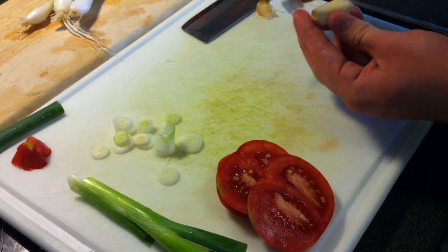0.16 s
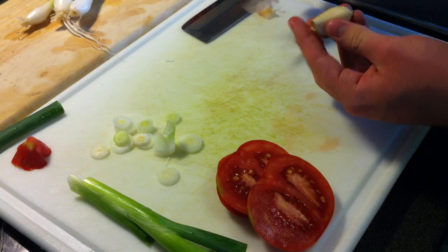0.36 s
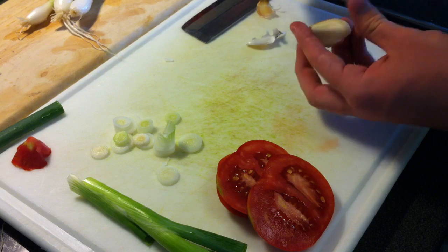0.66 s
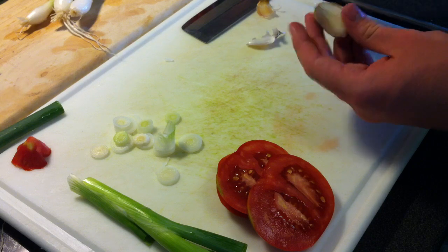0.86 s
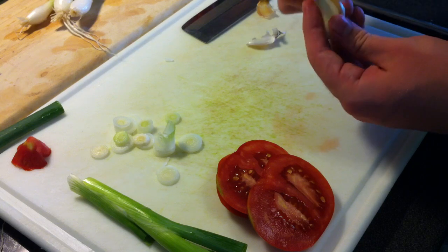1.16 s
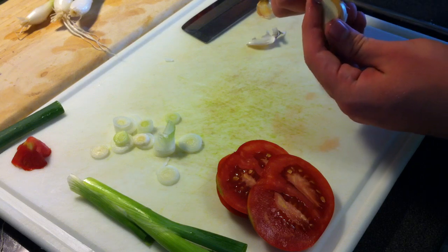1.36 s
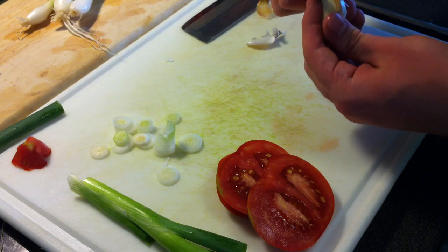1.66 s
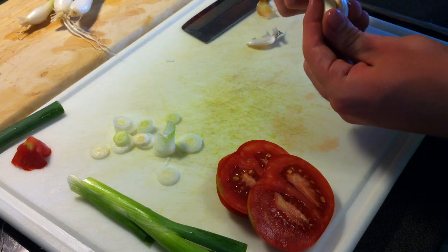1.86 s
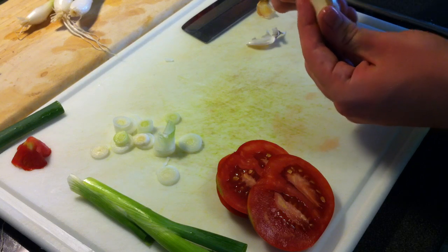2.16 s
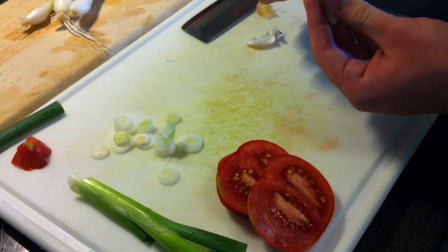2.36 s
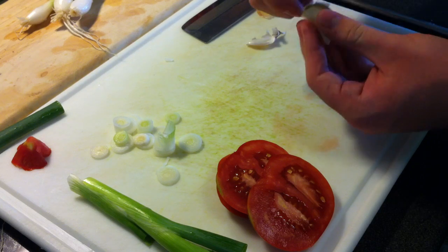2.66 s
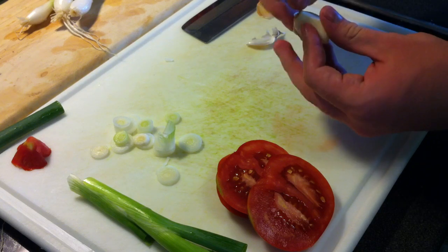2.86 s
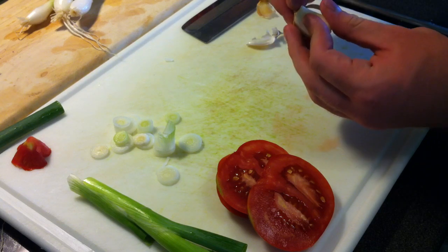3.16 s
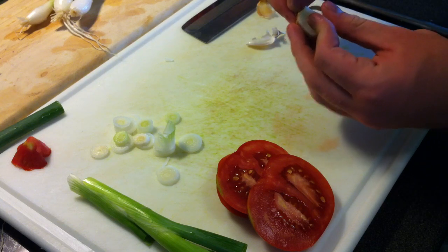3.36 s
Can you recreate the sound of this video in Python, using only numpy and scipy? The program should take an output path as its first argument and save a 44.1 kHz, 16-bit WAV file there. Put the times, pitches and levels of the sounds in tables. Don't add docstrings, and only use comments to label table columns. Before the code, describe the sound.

Papery garlic husk tears and ticks close by in a quiet kitchen with faint hum

```python
import sys
import numpy as np
from scipy import signal
from scipy.fft import rfft, irfft
from scipy.io import wavfile
from scipy.ndimage import uniform_filter1d

SR = 44100
rng = np.random.default_rng(int(sys.argv[2]) if len(sys.argv) > 2 else 0)


def dump(signal):
    limited = np.clip(np.atleast_2d(signal).T, -1, 1)
    pcm = np.round(limited * 32767).astype(np.int16)
    wavfile.write(sys.argv[1], SR, pcm)


def ratio_of_db(decibels):
    return 10 ** (np.asarray(decibels, float) / 20)


N = 154350


def evened(x):
    return x / np.sqrt(np.mean(x ** 2) + 1e-20)


def read(points, hz):
    f, value = np.transpose(points)
    return np.interp(np.log(hz + 1), np.log(f + 1), value)


def add(mix, s, sound):
    part = mix[max(round(s * SR), 0):][:len(sound)]
    part += sound[:len(part)]


def causal(gain):
    cep = irfft(np.log(gain + 1e-4))
    half = len(cep) // 2
    cep = np.r_[cep[0], 2 * cep[1:half], cep[half], np.zeros(half - 1)]
    return irfft(np.exp(rfft(cep)))[:half]


def bump(f, hz, octaves):
    return np.exp(-.5 * (np.log2((f + 1) / hz) / octaves) ** 2)


def wander(rate_hz):
    t = np.arange(N) / SR
    rates = rate_hz * np.geomspace(.05, 1, 16)
    return evened(sum(np.sin(2 * np.pi * (f * t + rng.random())) / np.sqrt(f) for f in rates))


def fractures(length):
    per_s, spread_db, first_db = 2600, 4.3, 9.5
    snap_s, rise_s = .0075, .0004
    rustle_db, rustle_t60 = -5.5, 0.04
    t = np.arange(4096) / SR
    cracks = (rng.random(4096) < per_s / SR) * rng.choice([-1., 1.], 4096)
    strength = ratio_of_db(spread_db * np.minimum(rng.exponential(size=4096), 2.5))
    clicks = cracks * strength / (1 + (t / length) ** 3)
    clicks += ratio_of_db(first_db + spread_db) / (1 + (length / snap_s) ** 4) * (t == 0)
    decay = ratio_of_db(rustle_db - 60 * np.maximum(t - length / 2, 0) / rustle_t60)
    return clicks + decay * rng.standard_normal(4096) * np.minimum(t / rise_s, 1)


def skin_and_clove(hz, body_db):
    # pitch in Hz, level in dB.
    clove_rings = [(1950, 5.5), (2480, 3)]
    skin_octaves, skirt_db, ripple_db = 0.37, -3, 1.6
    skirt_hz, skirt_top_hz = 2300 + 0.2 * hz, 2.2 * hz
    body_hz, body_octaves, body_cut_hz = 2280, 0.88, 700
    f = np.fft.rfftfreq(1024, 1 / SR)
    skirt = ratio_of_db(skirt_db) / (1 + (skirt_hz / (f + 1)) ** 4) / (1 + (f / skirt_top_hz) ** 4)
    skin = bump(f, hz, skin_octaves) + skirt
    clove = ratio_of_db(sum(db * bump(f, ring_hz, 0.042) for ring_hz, db in clove_rings))
    body = clove * bump(f, body_hz, body_octaves) / (1 + (body_cut_hz / (f + 1)) ** 4)
    ripple = uniform_filter1d(rng.standard_normal(len(f)), size=14)
    ripple = ratio_of_db(ripple_db * evened(uniform_filter1d(ripple, size=14)))
    return causal(ripple * skin + ratio_of_db(body_db + 10.5) * np.sqrt(ripple) * body)


def crackle(peak_db, hz, body_db, length):
    sound = signal.fftconvolve(fractures(length), skin_and_clove(hz, body_db))
    rms = np.sqrt(np.mean(sound[:round((length + .002) * SR)] ** 2))
    return ratio_of_db(peak_db - 3.5) * sound / (3 * rms)


def peel():
    # start in seconds, peak in dB, skin pitch in Hz, clove body relative to skin in dB, clump length in
    # seconds.
    clumps = [(-.001, -27, 8900, -21.5, .011), (.012, -31.5, 9400, -22, 0.016),
              (.0395, -30, 7900, -18.5, 0.0075), (.0915, -28, 7100, -17, 0.0056),
              (.1032, -25.5, 9100, -17.5, 0.0053), (.1092, -23, 12500, -22, 0.0051),
              (.1165, -29.5, 11000, -21, 0.0073), (.128, -32, 9050, -24, 0.01),
              (.1395, -28, 7640, -19.5, 0.0042), (.148, -27, 7500, -17.5, .005),
              (.156, -25, 10500, -34, 0.0038), (.1593, -14.5, 8800, -27.5, 0.0017),
              (.1618, -16, 8600, -29, 0.0033), (.1645, -21, 10500, -24, 0.0024),
              (.179, -29.5, 11000, -15, .01), (.1952, -23, 11500, -23, 0.002),
              (.1985, -22.5, 12500, -17.5, 0.0063), (.209, -31, 7200, -20, 0.0051),
              (.2194, -40, 12200, -12.5, 0.0051), (.2387, -41, 6900, -26, 0.0074),
              (.256, -46, 8000, -26, .006),
              (.3895, -43.5, 7500, -20, 0.0072), (.4035, -34.5, 11900, -36, 0.0055),
             (.4218, -33, 13000, -40, 0.004), (.4925, -47.5, 10000, -6, 0.012),
             (.5725, -47.5, 10500, -13, 0.006), (.588, -43.5, 13000, 3, 0.0067),
             (.7385, -42.5, 13000, -28, .003), (.7445, -43, 13500, -30, 0.0027),
             (.7988, -40.5, 11200, -23, .005), (1.262, -51.5, 3500, -11, 0.005),
             (1.333, -47.5, 5800, -22, 0.011), (1.385, -49.5, 10000, -16, .004),
             (1.40, -53, 8000, -17, 0.0097), (1.688, -43.5, 8700, -33, .004),
             (1.77, -47, 11000, -21, 0.0033), (1.776, -49, 15000, -30, .004),
             (1.795, -49.5, 5490, -16, 0.0053), (1.914, -47.5, 13000, -27, .005),
              (2.001, -47, 15000, -30, .003), (2.0128, -40, 9400, -33, 0.0059),
             (2.0232, -36.5, 7900, -14, .005), (2.0289, -33.5, 9500, -13.5, 0.0032),
             (2.0334, -33, 11100, -16, 0.0036), (2.0374, -37.5, 8950, -19, 0.0044),
             (2.0435, -44, 12000, -17, .005), (2.052, -53, 10000, -20, 0.0054),
             (2.0612, -42, 10000, -22, 0.0018), (2.068, -50, 6460, -20, 0.0049),
             (2.076, -47, 5200, -16, .006), (2.083, -49, 12000, -25, .008),
             (2.2055, -38.5, 14000, -23, 0.0013), (2.2363, -32.5, 14600, -5, 0.0019),
             (2.2405, -39, 8950, -10, 0.0025), (3.0225, -44.5, 13500, -24, 0.006),
             (3.103, -51, 14500, -26, .003), (3.3747, -49, 14600, -28, .004),
             (3.4191, -50.5, 13000, -29, .005), (3.443, -51.5, 8000, -24, 0.0096),
             (3.469, -45, 14000, -27, 0.0055), (3.479, -36.5, 12200, -22, .005),
             (3.493, -48, 12000, -21, .004),
              (.024, -38, 12000, -22, .012), (.05, -42, 13000, -28, .012), (.066, -43, 12000, -26, 0.013),
               (.1685, -34, 13000, -28, .005), (.186, -29, 8000, -23, 0.0078),
               (.3965, -40, 13500, -32, 0.0085), (.412, -41, 10500, -34, .008),
               (.4255, -40, 11000, -36, .006), (.433, -46, 12000, -34, .01),
               (2.0255, -37, 14500, -13, .005), (2.0415, -38, 14500, -23, 0.0054),
               (2.047, -44.5, 7000, -12, 0.0065), (2.065, -45, 13500, -20, .008),
               (2.072, -45, 5500, -22, .005), (2.089, -55, 9000, -24, 0.0082),
               (2.2095, -44, 14000, -22, 0.011), (2.2445, -51, 13000, -8, 0.0069),
               (2.254, -54, 9000, -4, .012), (3.026, -50, 11000, -24, .008), (3.484, -45, 13000, -22, .008)]
    skin = np.zeros(N)
    for s, *settings in clumps:
        add(skin, s + .0012, crackle(*settings))
    return skin


def board_knock(db, hz, octaves):
    knock = causal(bump(np.fft.rfftfreq(4096, 1 / SR), hz, octaves))
    gap = np.zeros(300)
    knock = np.r_[knock, gap] + 0.4 * np.r_[gap, knock]
    return ratio_of_db(db + 6.5) * knock / abs(knock).max()


def falling_husk():
    # start in seconds, level in dB, pitch in Hz, width in octaves.
    landings = [
        (.198, -57, 490, 0.18),
        (.199, -61.5, 710, 0.21),
        (.204, -61.5, 1370, 0.054),
        (.2, -64, 1000, 0.21),
        (.89, -68, 526, 0.27),
    ]
    husk = np.zeros(N)
    for s, *settings in landings:
        add(husk, s, board_knock(*settings))
    return husk


def kitchen(x):
    # frequency in Hz, t60 in seconds.
    decay = [(500, 0.32), (2000, 0.23), (6000, 0.31), (15000, 0.19)]
    # delay in seconds, level in dB.
    echoes = [(.0011, -14), (.0023, -8), (.0042, -14), (.0071, -15)]
    tail_db, shift_s = -8, .045
    out, turn = x.copy(), np.arange(N) / SR / shift_s
    for j in range(3):
        build_up = np.clip(np.arange(SR // 2) / SR / 0.012, 0, 1)
        taps = rng.standard_normal(SR // 2) * build_up
        hz, t, z = signal.stft(taps, SR, nperseg=128)
        fade = ratio_of_db(-60 * t / read(decay, hz)[:, None])
        tail = signal.istft(z * fade, SR, nperseg=128)[1]
        tail = ratio_of_db(tail_db) * tail / np.linalg.norm(tail)
        for k, (s, db) in enumerate(echoes):
            add(tail, s * rng.uniform(.7, 1.3), np.array([(-1) ** k * ratio_of_db(db)]))
        share = np.sqrt(2 / 3) * np.cos(np.pi * (turn + j) / 3)
        out += signal.fftconvolve(x * share, tail)[:N]
    return out


def fridge():
    # shaft order, level in dB.
    orders = [(2, -86), (3, -90), (4, -83.5), (5, -84), (7, -84), (8, -87), (9, -87)]
    motor_hz = 49
    turn = 2 * np.pi * np.cumsum(motor_hz * (1 + .002 * wander(2.07))) / SR
    hum = np.zeros(N)
    for k, db in orders:
        level = np.sqrt(2) * ratio_of_db(db + 1.3 * wander(4.03))
        hum += level * np.sin(k * turn + 2 * np.pi * rng.random())
    return hum


def room_and_mic():
    # frequency in Hz, noise density in dB per Hz.
    floor_curve = [(18, -58), (30, -4.5), (64, -18), (86, -13.5), (233, -2), (273, -5), (345, -4),
                   (560, -7.5), (16000, -17)]
    level_db = -65.5
    hz = np.fft.rfftfreq(N, 1 / SR)
    gain = ratio_of_db(read(floor_curve, hz)) * (hz < 17000)
    noise = irfft(rfft(rng.standard_normal(N)) * gain, N)
    return ratio_of_db(level_db + 0.19 * wander(5.4)) * evened(noise)


def scene():
    return (kitchen(peel() + falling_husk()) + room_and_mic() + fridge())[None]


def thin_bands(x):
    # start in seconds, length in seconds, low edge in Hz, high edge in Hz.
    gaps = [(.0865, .004, 1000, 12000), (.128, .003, 6000, 15000), (.18, .014, 350, 1200),
            (.387, .003, 7000, 16000), (.403, .012, 3800, 5300), (.781, .014, 6400, 8600),
            (.792, .003, 8600, 16000), (3.014, .004, 7000, 16000), (2.05, .03, 3300, 4200),
            (2.014, .008, 1800, 4000), (2.1995, .003, 6000, 16000), (2.219, .015, 3600, 8800),
            (2.217, .017, 10300, 12800)]
    hz, t, z = signal.stft(x, SR, nperseg=128, noverlap=96)
    mute = np.zeros((len(hz), len(t)), bool)
    for s, length, low, high in gaps:
        mute |= np.outer((hz > low) & (hz < high), (t > s) & (t < s + length))
    return signal.istft(z * ratio_of_db(-26 * mute), SR, nperseg=128, noverlap=96)[1][:, :N]


def low_pass(x):
    return signal.sosfilt(signal.butter(12, 16860, fs=SR, output="sos"), x)


def record(dry):
    edge_hz, bass_cut_hz, offset = 15950, 45, -.0001
    hz = np.fft.rfftfreq(N, 1 / SR)
    band = np.clip((edge_hz - hz) / 100, 0, 1) / (1 + (bass_cut_hz / (hz + 1)) ** 4)
    mix = thin_bands(irfft(rfft(dry) * band, N)) + offset
    return low_pass(mix)


dry = scene()
out = record(dry)
dump(out)
```